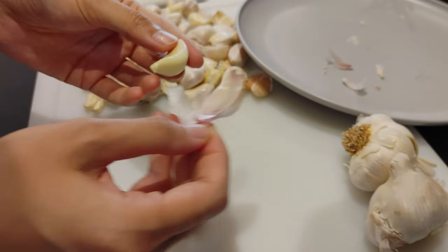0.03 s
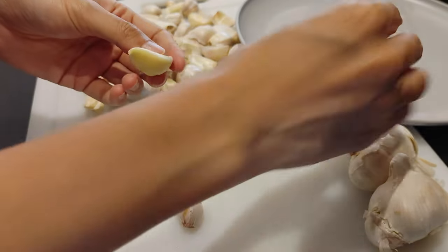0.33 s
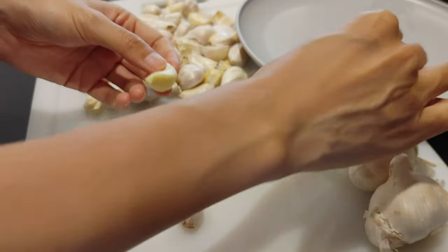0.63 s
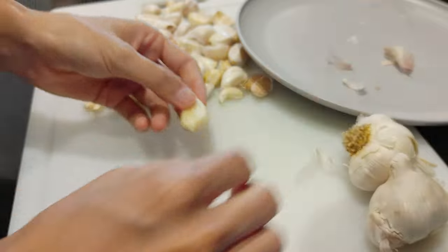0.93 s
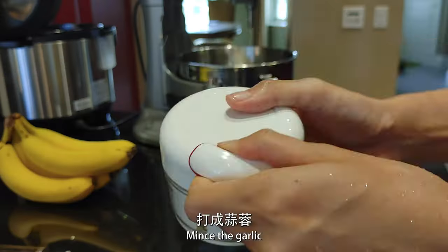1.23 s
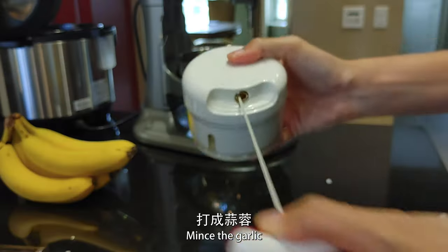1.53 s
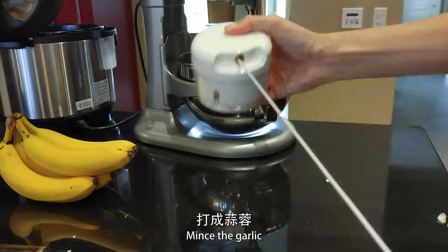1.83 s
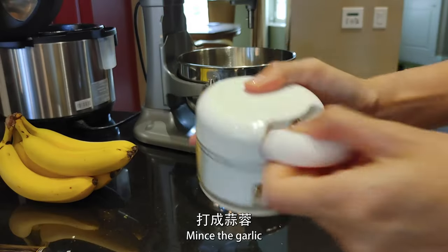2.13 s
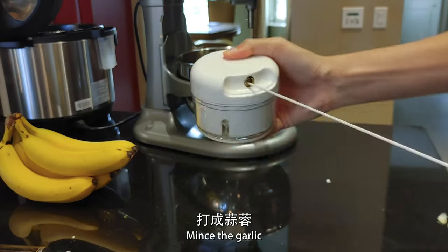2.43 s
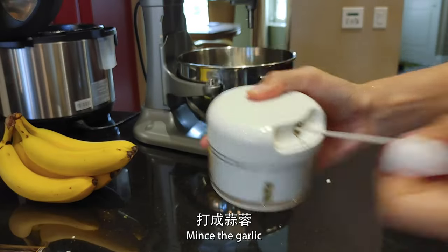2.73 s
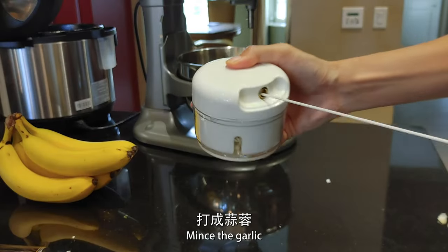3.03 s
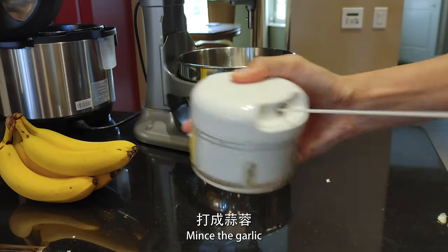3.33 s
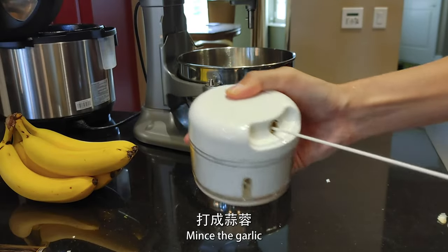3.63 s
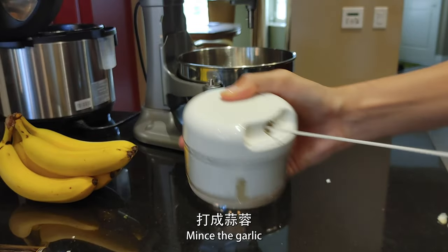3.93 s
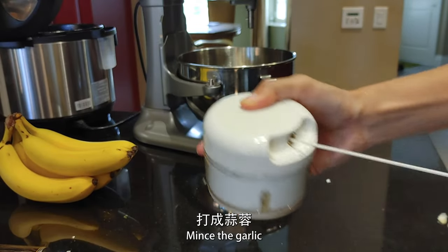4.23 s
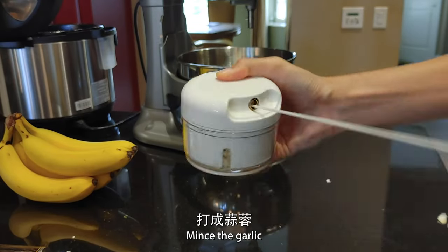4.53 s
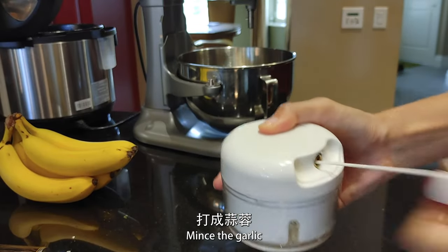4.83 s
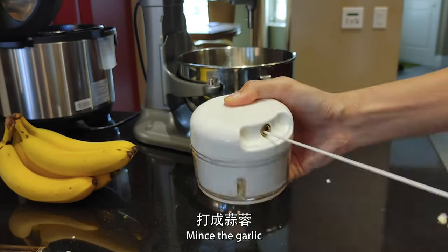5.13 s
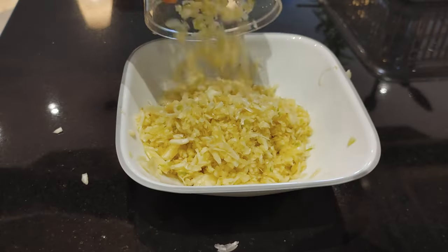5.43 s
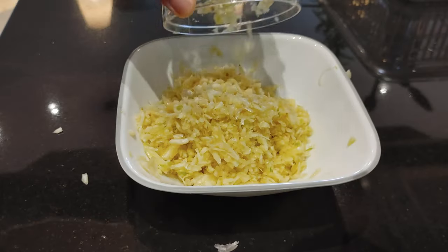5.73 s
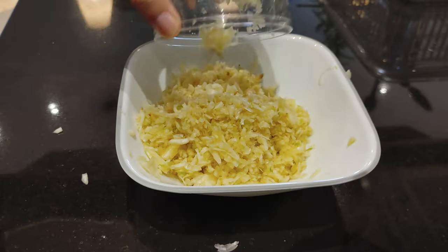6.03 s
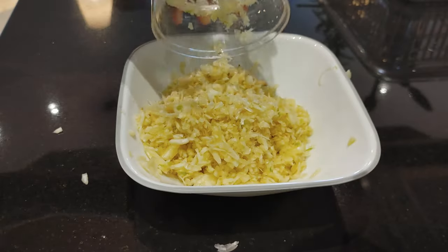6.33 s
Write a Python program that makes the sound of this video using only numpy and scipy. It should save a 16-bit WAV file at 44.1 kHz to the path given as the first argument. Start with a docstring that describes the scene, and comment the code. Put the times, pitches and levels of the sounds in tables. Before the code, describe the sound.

A hand-held chopper minces garlic close to the microphone, following a brief dry rustle of peeling and a light knock of a dish. Seven quick cord pulls set the blades whirring and the cloves battering the booming plastic bowl, alternating with the zipping rasp of the spring rewind and sharp plastic clacks. The chopping ends abruptly, and only low kitchen air and a faint appliance hum remain.

```python
"""Garlic in a kitchen. Over a low murmur of air, papery skin is rubbed off and crackles against a plate, then a
dish is nudged and scuffs on the board. A mains hum comes in and a hand-held pull-cord chopper gets seven pulls:
each spins the blades, so cloves batter the booming plastic bowl; then a spring rewinds the cord with a bright
rasp, and the drive catches with a clack ahead of the next pull. The chopper's sound breaks off abruptly, reverb
and all, leaving the air, the hum and one soft touch on the dish."""
import sys
import numpy as np
from scipy import signal
from scipy.fft import rfft, irfft, next_fast_len
from scipy.io import wavfile
from scipy.ndimage import uniform_filter1d, map_coordinates

SR = 44100
rng = np.random.default_rng(int(sys.argv[2]) if len(sys.argv) > 2 else 0)


def unload_audio(sound):
    """Save the sound as a 16-bit wav file, at the path given as the first command line argument."""
    columns = np.transpose(np.atleast_2d(sound))
    # keep every value between -1 and 1, then stretch to whole-number steps
    steps = np.round(np.clip(columns, -1, 1) * 32767)
    wavfile.write(sys.argv[1], SR, steps.astype(np.int16))


N = 285768
TIME = np.arange(N) / SR

# Levels in the tables are relative: each layer adds its own trim.
# room tone at the board and at the counter: freq_hz, level_db
BOARD_AIR = [(53, -83), (90, -44), (144, -15.5), (167, -1), (210, -5), (231, -30.5), (347, 2), (408, -7),
             (505, -42), (618, -3.5), (687, -44.5), (794, -70.5), (900, -49), (1170, -83), (1980, -120)]
COUNTER_AIR = [(30, -29.5), (70, -18.5), (105, -3.5), (150, -0.5), (250, -4), (350, 0.5), (410, -19.5),
               (520, -37), (605, -26.5), (700, -50), (1200, -73.5)]
# fader rides on those two beds: time_s, level_db
BOARD_RIDE = [(0.02, -70), (0.028, -81), (0.31, -58.5), (0.654, -75.5), (0.936, -63.5), (1.1, -76)]
COUNTER_RIDE = [(5.32, -54), (5.358, -47.5), (5.412, -55.5), (5.734, -46.5), (6.09, -55), (6.204, -51),
                (6.46, -48.5)]
# partials of the appliance hum: pitch_hz, level_db
HUM_PARTIALS = [(120, 0), (240, -4.5), (342, -18.5)]

# dry skin is rubbed off: peak_s, level_db, crinkle_hz
SKIN_RUBS = [(0.511, -56, 4440), (.572, -55, 3600), (0.655, -58.5, 3420), (.795, -81, 4620)]
# the skin snaps; soft touches on the dish: start_s, level_db
SKIN_SNAPS = [(0.502, -71), (0.55, -37), (0.577, -53), (0.656, -52.5), (0.679, -60)]
DISH_TOUCHES = [(1.117, -40.5), (1.193, -36), (1.208, -27), (1.2168, -20), (1.2207, -25), (5.71, -53)]
# the dish slides a little: time_s, level_db
DISH_SLIDE = [(1.1, -75), (1.13, -56.5), (1.18, -65), (1.21, -51.5), (1.28, -55.5)]

# cord pulls; the first takes two rows, a weak tug and the full pull:
# start_s, swell_s, hold_s, chop_db, boom_db, spray_db, judder_hz, judder_share
PULLS = [ (1.347, 0.049, 0.16, -35.5, -39, -45.5, 320.6, 0.72),
         (1.561, 0.063, .06, -26.5, -21, -38, 320, 0.55),
         (2.17, 0.073, 0.11, -25.5, -21.5, -35, 292.3, 0.39),
         (2.73, 0.067, .11, -26.5, -22.5, -35.5, 308.5, 0.59),
         (3.258, 0.056, 0.11, -27, -23.5, -35, 318, 0.4), (3.835, 0.074, 0.11, -26, -23, -34, 310.3, 0.37),
         (4.379, .065, 0.096, -25, -23, -34, 310, 0), (4.922, 0.075, 0.12, -25.5, -25, -33, 309, 0), ]
# the spring winds the cord back, with a tick as the drive lets go:
# start_s, swell_s, hold_s, rasp_db, boom_db, tick_db
REWINDS = [ (1.829, 0.051, 0.14, -25, -30, -26.5), (2.457, 0.034, 0.13, -24.5, -25.5, -24),
           (2.982, 0.093, 0.061, -24, -27.5, -47), (3.525, 0.081, 0.091, -25.5, -30, -39),
           (4.112, 0.051, .10, -23.5, -29, -32), (4.646, 0.054, 0.11, -24, -29, -29),
           (5.221, 0.011, .012, -36.5, -34, -49), ]
# the drive catches as the cord comes home: start_s, level_db, knock_offset_db, snap_offset_db
DRIVE_CATCHES = [(2.1435, -19, -7, -7), (2.7243, -21.5, -12, -22.5), (3.25, -14.5, -11.5, -6),
                 (3.8172, -13, -6, -8.5), (4.368, -21, 3.5, -5.5), (4.9147, -12, -31, -9)]
# a blade slams a whole piece against the wall: start_s, level_db, knock_offset_db
CLOVE_SLAMS = [(1.3905, -23.5, -2.5), (1.527, -21.5, -2.5), (1.7, -16, -11.5), (2.1952, -13, -21.5),
               (2.234, -12, -6), (2.4955, -16.5, -5), (2.7769, -13.5, -1), (2.833, -17, -2),
               (2.8605, -14, -13), (2.9152, -18.5, -7), (3.297, -12.5, -7.5), (3.8846, -18, -6.5),
               (4.0454, -13.5, -11), (4.4213, -13, -7), (4.5747, -14, -0.5), (4.9765, -12.5, -9.5),
               (5.0422, -10, -13), (5.117, -17, -17)]
# the jolted bowl thuds; hard plastic parts tick: start_s, level_db
BOWL_THUDS = [(1.475, -1.5), (2.699, -1.5), (2.916, 6), (3.311, 3.5), (3.559, -0.5), (3.934, 6)]
PLASTIC_TICKS = [(1.3366, -40.5), (1.429, -29), (1.529, -29.5), (1.701, -32), (2.196, -28), (2.525, -24.5),
                 (3.016, -20.5), (3.3982, -19.5), (3.9081, -18.5), (4.0178, -21.5), (4.0238, -16.5),
                 (4.5756, -16.5), (5.2388, -18), (5.2435, -17), (5.2483, -18)]

# resonances of each ringing part: pitch_hz, width_hz, level_db
PLATE_MODES = [(1085, 88, -4), (1514, 62, -4.5), (2360, 320, -8.5), (3450, 580, -7.5), (4500, 320, -14),
               (6500, 900, -26), (8500, 1500, -23)]  # brushed by the skin
DISH_MODES = [(504, 120, -12), (760, 36, 5.5), (1043, 84, 2.5), (1260, 110, -16), (1634, 130, -16)]
BOWL_MODES = [(283, 31.3, -2), (336.7, 59, 2), (372.8, 59.3, 1), (452.7, 39.7, -6.5), (544, 76.4, -12)]  # the hollow boom
WALL_MODES = [(890, 360, -12), (1510, 540, -3.5), (1748, 150, -3), (1983, 180, 3.5), (2427, 340, 1.5),
              (2614, 73, -3), (3740, 380, -10.5)]  # the bowl's wall under the chopping
SLAM_MODES = [(1540, 97, -7), (1837, 170, -1), (1935, 89, 0), (2120, 92, -2), (2370, 142, -3.5),
              (3900, 1600, -16.5)]  # the wall hit by a whole piece
DRIVE_MODES = [(391, 41, 5), (484.3, 71, -2), (890, 420, -9.5), (1437, 180, -4), (1940, 170, -5),
               (2460, 220, 2)]
LID_MODES = [(2418, 234, 8.5), (4100, 180, 10), (5413, 190, 1.5), (7350, 450, -18), (9150, 160, -4),
             (9640, 190, 9.5), (11650, 1200, -3)]  # lid and spool
SPRING_MODES = [(7034, 320, -1), (7310, 190, -4), (10760, 270, -13.5), (12900, 110, -14)]

# broad tone colours: freq_hz, level_db
SKIN_EQ = [(400, -45), (750, -19.5), (1000, 5.5), (9000, -6), (11000, -16), (14000, -32)]  # dry and papery
FINGER_EQ = [(200, -53), (420, 10), (1500, 5), (2400, -19.5), (5000, -22), (8000, -56)]  # a soft contact
SNAP_EQ = [(60, -49.5), (300, -30.5), (700, -6), (2500, -26.5), (4500, 0.5), (7100, 2.5), (7700, -1.5),
           (11500, 2.5), (15500, -11.5)]  # hard plastic on plastic
RASP_EQ = [(200, -31), (700, -6.5), (1100, -0.5), (2000, -7), (3500, -0.5), (6500, 0.5), (7800, 0.5),
           (11500, -5.5), (13000, -4), (15500, -4.5)]  # cord in the eyelet
SPRAY_EQ = [(1500, -28), (3300, -6.5), (4200, -6), (5600, 4.5), (7100, 1.5), (7650, -5.5), (9200, -1),
            (11500, -3), (12500, -8), (15500, -6.5)]  # fine bits hitting the wall
THUMP_EQ = [(20, -14), (60, -21), (130, -2), (220, 4), (600, 6.5), (1200, 1.5), (3000, -37)]  # the dull weight of the pieces
SHELL_EQ = [(200, 0.5), (560, -0.5), (690, -2), (850, 0.5), (1200, -1), (1800, 0)]  # the closed body radiates weakly between bowl and wall resonances

# stereo spread: freq_hz, side_minus_mid_db
STEREO_WIDTH = [(30, -7.5), (100, -15.5), (330, -17.5), (600, -4.5), (1200, -4), (2200, -6), (4500, -1),
                (9000, -1.5), (15000, 0)]
# stereo lean of the hands and chopper: freq_hz, left_minus_right_db
STEREO_BALANCE = [(120, 0.5), (380, -1.5), (1300, 0.5), (4400, -1.5), (8000, 0.5), (15000, 2.5)]
# the kitchen's reverb time: freq_hz, t60_s
KITCHEN_DECAY = [(200, 0.083), (2000, 0.32), (12000, 0.341)]

# envelope of each layer in a stroke: depth_db, rise_bend, lag_s, early_s, sag_db_per_s, fall_db_per_s
PULL_CHOP = (15.1, 0.81, 0.008, 0.0023, 3.3, 250)
PULL_BOOM = (16, 0.68, 0.002, 0.002, 14, 210)
PULL_SPRAY = (12.5, 0.48, 0.015, 0.0251, 5.6, 213)
REWIND_RASP = (14.5, 1.68, 0.014, 0.011, 14, 129)
REWIND_DRAG = (22, 1.8, 0.005, 0.016, 23, 210)
REWIND_BOOM = (12, 1.1, 0.002, 0.098, 36, 82)

COUNTER_FROM_S, CHOPPER_END_S = 1.285, 5.255
COAST_DB, COAST_DB_PER_S = -13, 66  # the blades run on after a pull and slow down
DRAG_BELOW_HZ = 1399  # below this the cord's scrape needs speed and fades first
GLANCE_S = 0.0005944  # typical delay of the bounce off the counter
TOP_HZ = 15750


def amp(db):
    """Decibels to gain."""
    return 10 ** (np.asarray(db) / 20)


def unit(x):
    """Scale to rms 1."""
    return x / np.sqrt(np.mean(x ** 2) + 1e-20)


def along(points, hz):
    """Read a curve of (freq_hz, value) points on a log frequency axis."""
    f, v = np.transpose(points)
    return np.interp(np.log(hz + 1), np.log(f + 1), v)


def wobble(rate):
    """A smooth random curve, rate knots a second."""
    return map_coordinates(rng.standard_normal(int(N * rate / SR) + 4), [TIME * rate])


def gate(start, end, rise, fall):
    """1 from start to end, with an exponential rise before and fall after."""
    return np.exp(-np.maximum(start - TIME, 0) / rise - np.maximum(TIME - end, 0) / fall)


def filtered(x, response):
    """Filter x by a gain given as a function of frequency."""
    m = next_fast_len(N + SR // 2)
    return irfft(rfft(x, m) * response(np.fft.rfftfreq(m, 1 / SR)), m)[..., :N]


def coloured(x, eq):
    """x through a broad EQ curve, at rms 1."""
    return unit(filtered(x, lambda f: amp(along(eq, f))))


def rung(x, modes):
    """x through parallel resonances of alternating polarity, at rms 1."""
    def response(f):
        return sum((-1) ** k * amp(db) * 1j * f * width / (hz * hz - f * f + 1j * f * width)
                   for k, (hz, width, db) in enumerate(modes))
    return unit(filtered(x, response))


def steadied(x, span_s):
    """Even out swells slower than span_s and keep the grain."""
    power = uniform_filter1d(x * x, int(span_s * SR) + 1)
    return x / np.sqrt(np.abs(power) + 1e-3)


def impacts(rate, spread_db):
    """Tiny blows of random size at random moments, about rate a second, at rms 1."""
    size = amp(spread_db * np.clip(rng.standard_normal(N), -2, 2)) * rng.choice([-1, 1], N)
    return unit(size * (rng.random(N) < rate / SR))


def chatter(starts, levels_db, length_s):
    """Two hard surfaces buzz against each other in a short burst at each start."""
    t = np.arange(SR // 20) / SR
    burst = np.exp(-(t / length_s) ** 4)
    out = np.zeros(N + SR)
    for start, db in zip(starts, levels_db):
        out[round(start * SR):][:len(t)] += amp(db) * burst * rng.choice([-1, 1], len(t))
    return out[:N]


def strokes(rows, levels_db, shape, edge_s, coast_db=-np.inf):
    """A layer's envelope: each stroke sets in, swells, sags and dies, coasting on if coast_db is given."""
    depth_db, bend, lag, early, sag_rate, fall_rate = shape
    power = np.zeros(N)
    for (start, swell, hold, *_), level_db in zip(rows, levels_db):
        t = TIME - start
        onset = np.exp(np.clip(t / edge_s, -30, 0))
        rise_left = np.clip(1 - t / (swell + lag), 0, 1) ** bend
        released_s = np.maximum(t - swell - hold + early, 0)
        release_db = np.maximum(-fall_rate * released_s, coast_db - COAST_DB_PER_S * released_s)
        db = release_db - depth_db * rise_left - sag_rate * np.maximum(t - swell, 0)
        power += (amp(level_db) * amp(np.maximum(db, -200)) * onset) ** 2
    return np.sqrt(power)


def widened(source):
    """Play a source as mid and again as side: same envelope, fresh grain, widest in the treble."""
    mid = source()
    side = filtered(source(), lambda f: 1j * amp(along(STEREO_WIDTH, f)))
    return np.array([mid + side, mid - side])


def kitchen_reverb(x):
    """A short room tail, its lows dying first."""
    hz, t, noise = signal.stft(rng.standard_normal((2, SR // 2)), SR, nperseg=256)
    decay = amp(-60 * t / along(KITCHEN_DECAY, hz)[:, None])
    tail = signal.istft(noise * decay, SR, nperseg=256)[1]
    return signal.fftconvolve(x, tail / np.linalg.norm(tail[0]), axes=1)[:, :N]


def counter_bounce(x, gain_db):
    """The chopper sways over the counter, so its reflection's delay wanders and the colour shifts."""
    delay = GLANCE_S * amp(2 * wobble(4))
    return x + amp(gain_db) * np.array([np.interp(TIME - delay, TIME, channel) for channel in x])


def room_tone():
    """A bed of low moving air; by the counter an appliance hums as well."""
    board_gain = amp(np.interp(TIME, *np.transpose(BOARD_RIDE)))
    board = board_gain * coloured(rng.standard_normal(N), BOARD_AIR)
    air = amp(-5) * coloured(rng.standard_normal(N), COUNTER_AIR)
    hum = sum(amp(db - wobble(7.8)) * np.sin(2 * np.pi * hz * TIME + 0.1 * wobble(5.5))
              for hz, db in HUM_PARTIALS)
    counter_gain = amp(np.interp(TIME, *np.transpose(COUNTER_RIDE), left=-52))
    crossfade = np.clip((TIME - COUNTER_FROM_S) / 0.005, 0, 1)
    return (1 - crossfade) * board + crossfade * counter_gain * (air + hum)


def garlic_skin():
    """Papery skin rustles, crinkles and snaps between the fingers, against the plate."""
    rubs = [amp(db) * gate(s, s, rise=0.0099, fall=0.037) for s, db, _ in SKIN_RUBS]
    flakes = impacts(rate=1200, spread_db=3.5)
    crinkle = sum(rub * rung(flakes, [(hz, 500, 0)]) for rub, (_, _, hz) in zip(rubs, SKIN_RUBS))
    rustle = amp(-5) * sum(rubs) * flakes
    crackle = rustle + chatter(*np.transpose(SKIN_SNAPS), length_s=0.0047)
    on_plate = crackle.std() * coloured(rung(crackle, PLATE_MODES), SKIN_EQ)
    return on_plate + crinkle.std() * coloured(crinkle, SKIN_EQ)


def dish():
    """Soft touches ring a dish briefly, and it scuffs on the board."""
    blows = np.zeros(N)
    for s, db in DISH_TOUCHES:
        blows[round(s * SR)] = amp(db)
    ring = amp(16.5) * blows.std() * coloured(rung(blows, DISH_MODES), FINGER_EQ)
    times, slide_db = np.transpose(DISH_SLIDE)
    slide = amp(np.interp(TIME, times, slide_db)) * gate(times[0], times[-1], rise=0.0032, fall=0.004)
    return ring + slide * coloured(impacts(rate=2500, spread_db=6), FINGER_EQ)


def bowl_knocks(starts, levels_db):
    """Single blows boom in the bowl."""
    blows = np.bincount(np.round(starts * SR).astype(int), amp(levels_db), N)
    return blows.std() * rung(blows, BOWL_MODES)


def clacks():
    """Hard hits on plastic: the drive catches, big pieces slam, the bowl thuds and loose parts tick."""
    starts, db, knock_db, snap_db = np.transpose(DRIVE_CATCHES)
    catch = chatter(starts, db, length_s=0.0067)
    snap = chatter(starts, db + snap_db, length_s=0.0081)
    drive = amp(-5) * catch.std() * rung(catch, DRIVE_MODES) + amp(14) * bowl_knocks(starts, db + knock_db)
    starts, db, knock_db = np.transpose(CLOVE_SLAMS)
    slam = chatter(starts, db, length_s=0.0029)
    slams = amp(-4.5) * slam.std() * rung(slam, SLAM_MODES) + amp(19) * bowl_knocks(starts, db + knock_db)
    thuds = bowl_knocks(*np.transpose(BOWL_THUDS))
    ticks = PLASTIC_TICKS + [(start, tick_db) for start, *_, tick_db in REWINDS]
    bright = amp(-1) * snap + amp(-1.7) * chatter(*np.transpose(ticks), length_s=0.0027)
    return drive + slams + thuds + bright.std() * coloured(bright, SNAP_EQ)


def cord_rewind():
    """The cord scrapes through its eyelet and the spring slides on itself, ringing lid and bowl."""
    starts, _, _, rasp_db, boom_db, _ = np.transpose(REWINDS)
    rasp = strokes(REWINDS, rasp_db, REWIND_RASP, edge_s=0.0024)
    drag = strokes(REWINDS, rasp_db, REWIND_DRAG, edge_s=0.002)
    boom = strokes(REWINDS, boom_db, REWIND_BOOM, edge_s=0.0016)
    slips = amp(1.5 * wobble(260)) * impacts(rate=16000, spread_db=1)
    ticks = impacts(rate=150, spread_db=9.5)
    scrape = slips + 0.24 * ticks
    # the coil rings most while tightly wound, at the start of each rewind
    tension = sum(gate(s, s, rise=0.003, fall=0.1) for s in starts)
    spring = amp(-3.5) * tension * rung(scrape, SPRING_MODES)
    lid = amp(-3 + 2.6 * wobble(25)) * rung(scrape, LID_MODES)
    eyelet = amp(0.5) * coloured(scrape, RASP_EQ)
    lows = filtered(eyelet, lambda f: 1 / (1 + (f / DRAG_BELOW_HZ) ** 4))
    bowl = steadied(rung(ticks + slips, BOWL_MODES), span_s=0.14)
    return rasp * (eyelet - lows + lid + spring) + drag * lows + boom * bowl


def rotor_judder():
    """Coarse cloves shake the rotor: a wavering growl at rms 1, and its share of the boom's power."""
    starts, *_, hz, share = np.transpose(PULLS)
    pull = np.maximum(np.searchsorted(starts, TIME) - 1, 0)
    pitch_hz = hz[pull] * (1 + 0.015 * wobble(90) + 0.012 * wobble(18))
    phase = 2 * np.pi * np.cumsum(pitch_hz) / SR
    growl = amp(1.5 * wobble(80)) * (np.sin(phase) + amp(-22) * np.sin(2 * phase))
    return unit(growl), share[pull]


def blades():
    """On each pull the blades sweep through the garlic in quick surges and fling it against the wall."""
    chop_db, boom_db, spray_db = np.transpose(PULLS)[3:6]
    chop = strokes(PULLS, chop_db, PULL_CHOP, edge_s=0.015, coast_db=COAST_DB)
    boom = strokes(PULLS, boom_db, PULL_BOOM, edge_s=0.0088, coast_db=-14)
    spray = strokes(PULLS, spray_db, PULL_SPRAY, edge_s=0.018, coast_db=COAST_DB)
    surge_hz = 55 * amp(1.5 * wobble(11))
    surge = amp(0.6 * np.sin(2 * np.pi * np.cumsum(surge_hz) / SR))
    pieces = surge * impacts(rate=1000, spread_db=2.5)
    mush = surge * impacts(rate=9000, spread_db=5)
    growl, share = rotor_judder()
    hollow = steadied(rung(pieces, BOWL_MODES), span_s=0.046)
    bowl = np.sqrt(1 - share) * hollow + amp(1) * np.sqrt(share) * growl
    thump = amp(-12) * coloured(pieces, THUMP_EQ)
    # each piece lands somewhere else and so favours other resonances
    hits = pieces + 0.5 * mush
    wall = sum(amp(db) * np.sqrt(width) * rung(hits * amp(3.5 * wobble(70)), [(hz, width, 0)])
               for hz, width, db in WALL_MODES)
    wall = coloured(wall, [(300, -1), (900, 0.5), (4500, -2), (9000, -12.5)])  # soften the top
    wall = steadied(wall, span_s=0.09)
    bits = steadied(coloured(0.7 * pieces + mush, SPRAY_EQ), span_s=0.043)
    lumps = amp(-7) * rung(impacts(rate=80, spread_db=0), SLAM_MODES)  # whole pieces knock on the wall
    return boom * (amp(1) * bowl + thump) + chop * (amp(-0.17) * wall + lumps) + amp(2.5) * spray * bits


def scene():
    """Hands at the board, then the chopper, over room tone; the top end of the action leans left."""
    chopper = counter_bounce(widened(lambda: blades() + cord_rewind() + clacks()), gain_db=-12)
    chopper = filtered(chopper, lambda f: amp(along(SHELL_EQ, f) - 1.03))
    sudden_end = np.exp(-np.maximum(TIME - CHOPPER_END_S, 0) / 0.0064)  # cuts the reverb too
    chopper = (chopper + amp(-17) * kitchen_reverb(chopper)) * sudden_end
    hands = widened(lambda: dish() + garlic_skin())
    action = chopper + hands + amp(-12) * kitchen_reverb(hands)
    left_right = np.array([[0.5], [-0.5]])
    action = filtered(action, lambda f: amp(along(STEREO_BALANCE, f) * left_right))
    return action + widened(room_tone)


def record(dry):
    """A steep high cut on the whole mix."""
    return filtered(dry, lambda hz: 1 / (1 + (hz / TOP_HZ) ** 160))


dry = scene()
out = record(dry)
unload_audio(out)
```